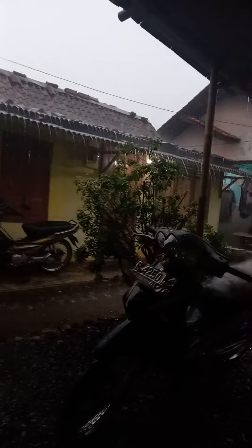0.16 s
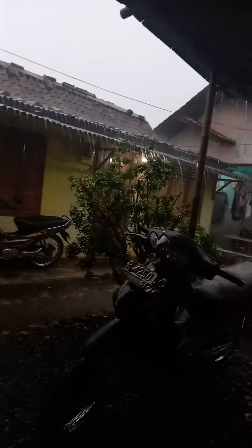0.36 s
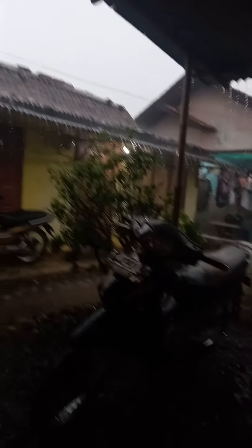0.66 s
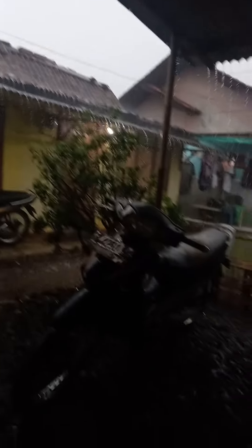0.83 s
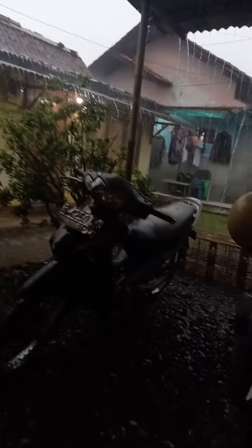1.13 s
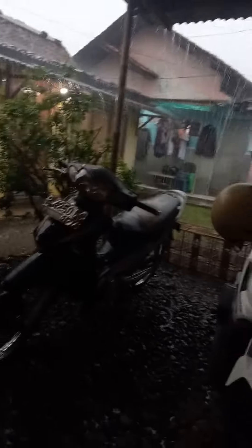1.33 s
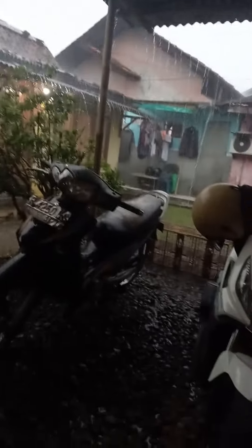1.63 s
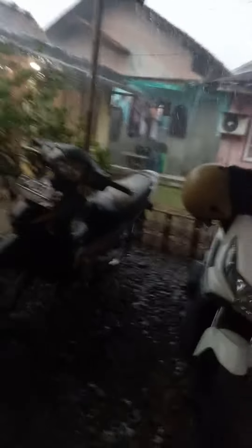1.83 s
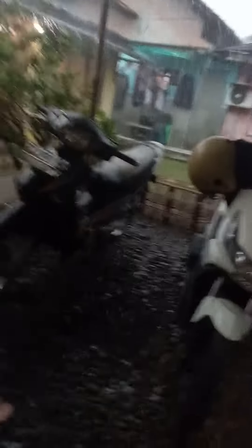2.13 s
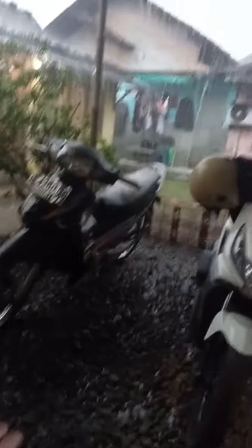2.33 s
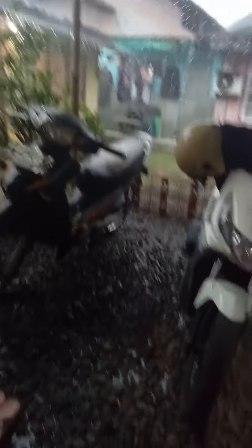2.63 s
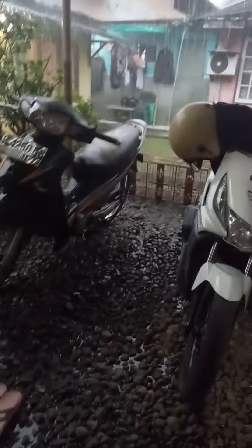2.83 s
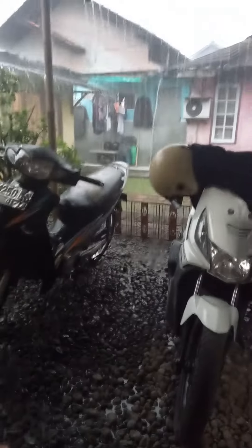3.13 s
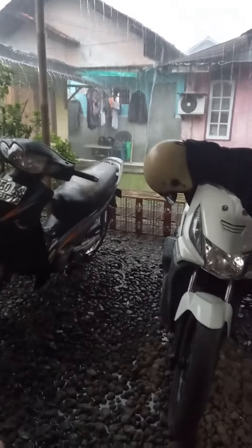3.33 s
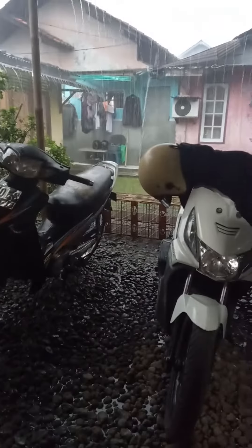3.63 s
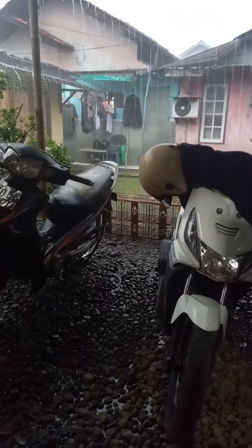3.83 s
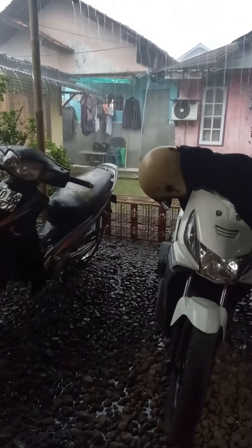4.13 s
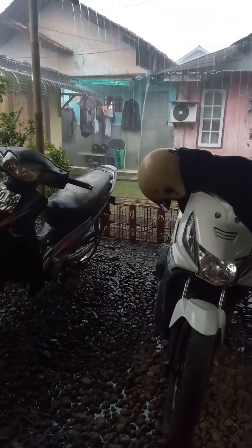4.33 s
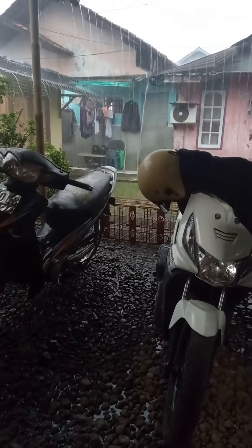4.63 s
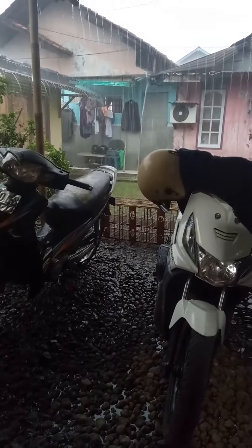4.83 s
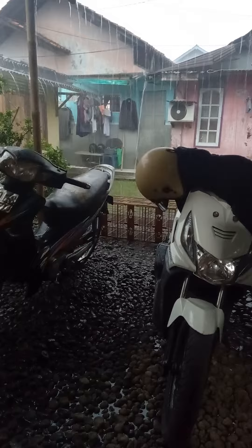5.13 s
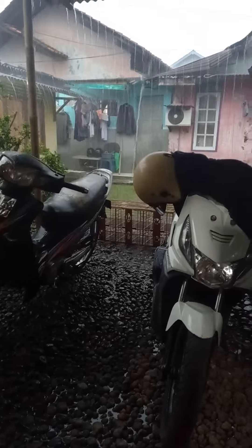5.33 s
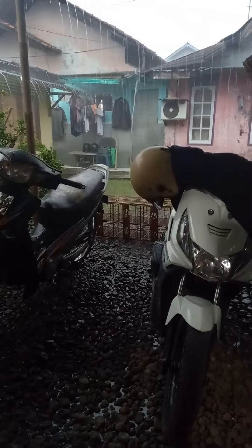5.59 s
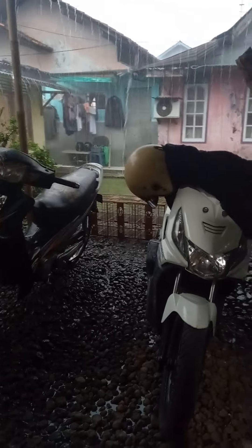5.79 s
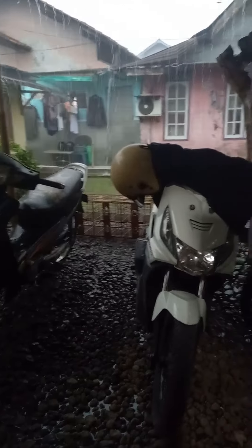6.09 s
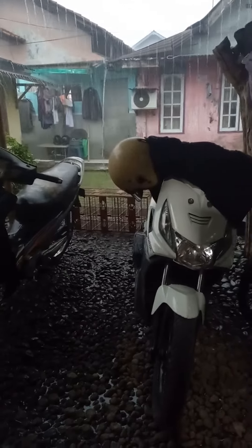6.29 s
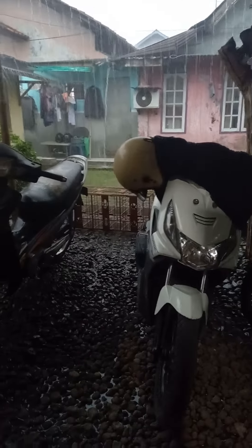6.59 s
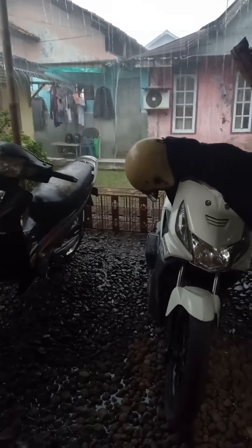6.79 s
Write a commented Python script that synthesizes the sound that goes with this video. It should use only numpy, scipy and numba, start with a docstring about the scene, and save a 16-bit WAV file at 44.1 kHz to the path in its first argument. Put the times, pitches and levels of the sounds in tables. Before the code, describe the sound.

Steady downpour with roof patter and splattering eaves run-off; a deep thunder peal bursts midway and rumbles on in fading swells.

```python
"""Heavy rain pours on a gravel yard and drums on the corrugated roof of the porch over two microphones.
Drops are short damped rings over a wash of noise; run-off from the eaves splatters, spatters and trickles.
Thunder mutters far off, breaks into a loud peal and rolls on in swells: filtered trains of random shocks,
with single booms as sinking tones. The gain control ducks everything under the peal and is slow to let go."""
import sys
import numpy as np
from scipy.fft import rfft, irfft, next_fast_len
from scipy.io import wavfile
from scipy.ndimage import uniform_filter1d, minimum_filter1d, map_coordinates
from numba import njit

SR = 44100
rng = np.random.default_rng(int(sys.argv[2]) if len(sys.argv) > 2 else 0)


def materialize(psi):
    """Save the field psi as 16-bit PCM at rate SR to the path in sys.argv[1].

    A 1-D psi becomes a single channel; in a 2-D psi each row is a channel.
    """
    bounded = np.clip(np.atleast_2d(psi).T, -1, 1)
    quanta = np.round(bounded * 32767).astype(np.int16)
    wavfile.write(sys.argv[1], SR, quanta)


N = 306495
SECONDS = np.arange(N) / SR


def amp(db):
    """Decibels to gain."""
    return 10 ** (np.asarray(db) / 20)


def unit(x):
    """Scale to rms 1."""
    return x / np.sqrt(np.mean(x ** 2) + 1e-20)


def along(points, hz):
    """Gain of (Hz, dB) points joined on a log frequency axis."""
    f, db = np.transpose(points)
    return amp(np.interp(np.log(hz + 1), np.log(f + 1), db))


def wobble(rate):
    """A smooth random curve with rate knots a second."""
    knots = rng.standard_normal(int(N * rate / SR) + 4)
    return map_coordinates(knots, [np.arange(N) * rate / SR])


def drift(start_db, db_per_s, since=0):
    """Gain that changes by a steady number of decibels a second."""
    return amp(start_db + db_per_s * (SECONDS - since))


def sides(right_db):
    """Gains that raise the right microphone by right_db and lower the left by as much."""
    return amp([[-right_db], [right_db]])


def filtered(x, response):
    """x times a response of frequency."""
    size = next_fast_len(N + 8192)
    spectrum = rfft(x, size) * response(np.fft.rfftfreq(size, 1 / SR))
    return irfft(spectrum, size)[..., :N]


def coloured(x, spectrum):
    """x filtered by the curve of a spectrum table, at rms 1."""
    return unit(filtered(x, lambda hz: along(spectrum, hz)))


# Where the rain falls around the microphones.
# Each row: lag of the right microphone in ms, share of the power in dB.
RAIN_BEARINGS = [(-.47, -5.5), (-.3, -6.5), (-.15, -10.5), (.05, -4.5), (.23, -1), (0.501, -1)]


def bearings(count=64):
    """Lags between the microphones (s) and the share of the rain's power that arrives with each."""
    ms, db = np.transpose(RAIN_BEARINGS)
    lag = np.linspace(ms.min(), ms.max(), count)
    share = amp(np.interp(lag, ms, db)) ** 2
    return lag / 1000, share / share.sum()


def wash(direct=0.61):
    """Countless far drops merge into noise: more alike at both microphones in the bass than in the treble."""
    lag, share = bearings()
    grid = np.fft.rfftfreq(2048, 1 / SR)
    likeness = np.exp(-2j * np.pi * grid[:, None] * lag) @ share
    likeness = likeness * np.interp(grid, [200, 500], [1, direct])  # the porch scatters shorter waves
    unlikeness = np.sqrt(np.abs(1 - np.abs(likeness) ** 2))
    left, other = rng.standard_normal((2, N))
    shared = filtered(left, lambda hz: np.interp(hz, grid, likeness))
    own = filtered(other, lambda hz: np.interp(hz, grid, unlikeness))
    return np.array([left, shared + own])


def drops(count, low_hz, high_hz, cycles, spread_db, size):
    """Near drops: each a short damped ring (size samples) of its own pitch, weight and bearing."""
    when, pitch, weight, place, life = rng.random((count, 5)).T
    hz = (low_hz + (high_hz - low_hz) * pitch)[:, None]
    decay = cycles * (.5 + life[:, None]) / hz
    weight_db = -spread_db * np.log(np.maximum(weight, .015))  # a few drops are much heavier
    strength = amp(weight_db)[:, None] / np.sqrt(decay)
    lag, share = bearings()
    right_lag = SR * np.interp(place, np.cumsum(share), lag)
    pair = []
    for start in (when * N, when * N + right_lag):
        start = np.abs(start)[:, None]
        index = np.ceil(start).astype(int) + np.arange(size)
        t = (index - start) / SR  # keeps the lag finer than one sample
        ring = strength * np.exp(-t / decay) * np.sin(2 * np.pi * hz * t)
        pair.append(np.bincount(index.ravel(), ring.ravel(), N)[:N])
    return unit(np.array(pair))


# Tone of the rain on the roof sheets overhead. Each row: frequency in Hz, relative level in dB per Hz.
ROOF_SPECTRUM = [(45, -33), (80, -5.5), (140, 1.5), (200, -1.5), (300, 0.5), (500, 0), (640, -0.3),
                 (790, -0.3), (1050, -3), (1450, -3), (2100, -5.5), (3000, -14.5), (5000, -18),
                 (16000, -35)]


def roof(start_db=-17, db_per_s=0.5):
    """Drops drum on the roof sheets, ever thicker; the nearest stand out of the roar as dull taps."""
    taps = drops(count=5000, low_hz=240.0, high_hz=2275, cycles=3.4, spread_db=2, size=400)
    roar = coloured(wash() + amp(-18.5) * taps, ROOF_SPECTRUM)
    return roar * drift(start_db, db_per_s)


# Tone of the rain on the gravel out in the yard. Each row: frequency in Hz, relative level in dB per Hz.
YARD_SPECTRUM = [(300, -6), (1500, 1), (2200, 2.5), (3000, 2), (4500, 0.5), (5400, 1.5), (5950, 3),
                 (6500, 5), (7000, 0.5), (9000, -0.5), (16000, -2.5)]


def yard(start_db=-18.0, db_per_s=0.1556):
    """Rain splashes on the wet gravel in uneven spurts and slowly thickens."""
    splashes = drops(count=14000, low_hz=1750, high_hz=15300, cycles=1.17, spread_db=1.5, size=100)
    spurts = amp(1.6 * wobble(32) + 0.5 * wobble(13))
    hiss = coloured(wash() + amp(-6.5) * splashes * spurts, YARD_SPECTRUM)
    return hiss * drift(start_db, db_per_s) * amp(0.53 * wobble(18))


# Tone of the run-off at the porch edge. Each row: frequency in Hz, relative level in dB per Hz.
EAVES_SPECTRUM = [(300, -20), (650, -0.3), (1000, 5), (1600, 0), (2400, -7), (2900, -10.5), (3700, -23),
                  (16000, -42)]
# Strength of the run-off, nearest at first. Each row: time in seconds, level in dB.
RUNOFF_LEVEL = [(0, -17.5), (1.2, -21), (3.1, -20.5), (3.6, -22), (4.6, -23.5), (5.4, -24), (6.95, -22)]


def eaves():
    """Strings of run-off fall from the eaves and splatter into puddles."""
    plops = drops(count=7000, low_hz=800, high_hz=3470, cycles=0.76, spread_db=0.5, size=200)
    splatter = coloured(wash() + amp(-5.5) * plops, EAVES_SPECTRUM)
    s, db = np.transpose(RUNOFF_LEVEL)
    return splatter * amp(np.interp(SECONDS, s, db) + .4 * wobble(19))


# Tone of the nearest run-off, on the right. Each row: frequency in Hz, relative level in dB per Hz.
SPATTER_SPECTRUM = [(1500, -23), (1950, 5), (2300, -2), (2850, 2), (3150, -7), (3600, -25)]


def spatter(start_db=-27.3, db_per_s=-10, right_db=5.0):
    """The nearest string of run-off, on the right, spatters brightly at first and soon sinks into the rain."""
    splats = drops(count=10000, low_hz=1800, high_hz=3200, cycles=2, spread_db=3.0, size=150)
    return coloured(splats, SPATTER_SPECTRUM) * drift(start_db, db_per_s) * sides(right_db)


# Tone of thin run-off on the stones to the right. Each row: frequency in Hz, relative level in dB per Hz.
TRICKLE_SPECTRUM = [(2300, -24), (2850, -2), (3600, -4.5), (4100, -4), (4900, -22)]


def trickle(level_db=-35.0, opens_s=1.2, right_db=5):
    """A thinner string patters crisply on the stones to the right, fading in as the microphones turn to it."""
    ticks = drops(count=5000, low_hz=2720, high_hz=4030, cycles=2.7, spread_db=3.0, size=150)
    facing = np.minimum(SECONDS / opens_s, 1)
    return coloured(ticks, TRICKLE_SPECTRUM) * amp(level_db) * facing * sides(right_db)


def shocks(count):
    """Pressure steps from the kinks of the bolt, arriving at random."""
    when, strength = rng.random((count, 2)).T
    return np.bincount((when * N).astype(int), 2 * strength - 1, N)


def rumble(spectrum, count):
    """A dense train of shocks, dulled by distance into an unbroken rumble of rms 1."""
    x = coloured(shocks(count), spectrum)
    loudness = np.sqrt(np.abs(uniform_filter1d(x ** 2, SR // 22)) + 1e-6)
    return unit(x / loudness)  # evens out chance swells


def surges(rows, attack, fade):
    """Power of overlapping arrivals: each rises, holds for its length and dies away (attack, fade in s)."""
    power = 0
    for start, db, length in rows:
        rise = np.clip((SECONDS - start) / attack, 0, 1)
        fall = np.exp(-np.maximum(SECONDS - start - length, 0) / fade)
        power = power + (amp(db) * rise * fall) ** 2
    return power


# Mid-range tone of the nearer branches. Each row: frequency in Hz, relative level in dB per Hz.
CRACKLE_SPECTRUM = [(30, -43), (60, -6), (100, -15), (160, 6), (225, -4), (300, -13.5), (450, -25.5),
                    (1200, -56)]
# Peals from nearer parts of the bolt. Each row: start in seconds, level in dB, length in seconds.
PEAL_ARRIVALS = [(3.19, -13.5, 0.26), (3.6, -17.5, 0.29), (4.1, -21, 0.92), (5.1, -22.5, 0.38),
                 (5.55, -23.5, 0.25), (5.79, -20, 0.32)]


def peals(attack=0.012, fade=0.17):
    """Nearer branches arrive abruptly and keep more of their mid range."""
    return np.sqrt(surges(PEAL_ARRIVALS, attack, fade)) * rumble(CRACKLE_SPECTRUM, count=2500)


# Single thunder booms and knocks. Each row: crest in seconds, peak in dB, pitch at the crest in Hz.
BOOM_ARRIVALS = [(.645, -15, 93), (.96, -14.5, 300), (1.481, -16, 154), (2.831, -13, 151), (2.911, -15, 97),
                 (3.17, -17, 76), (3.22, -13, 155), (3.249, -7, 238), (3.285, -13, 82), (3.329, -4, 152),
                 (3.381, -5, 160), (3.408, -3, 78), (3.465, -5, 93), (3.473, -2, 166), (3.528, -3.5, 172),
                 (3.572, -7, 247), (3.627, 1, 94.5), (3.682, -6, 93), (3.741, -7, 104), (3.801, -11, 95),
                 (3.935, -7.5, 100), (4.124, -10, 165), (4.42, -4, 98), (4.475, -17, 98),
                 (4.534, -5.5, 106), (4.608, -9.5, 101), (5.095, -15, 97), (5.163, -10, 85.4),
                 (5.23, -21, 102.4), (5.285, -8.5, 100), (5.296, -14, 220), (5.715, -2, 92),
                 (5.802, -5, 90), (5.95, -8, 150), (6.041, -11, 145), (6.195, -3, 98), (6.256, -6, 97),
                 (6.347, -9, 95), (6.682, -8, 98), (6.74, -14, 94), (6.79, -10, 101)]


def booms(rise_cycles=2.405, sag=0.037, size=8000):
    """Shocks arriving together thud for a few cycles, sinking in pitch; the higher ones are shorter."""
    out = np.zeros(N + size)
    for crest, db, hz in BOOM_ARRIVALS:
        cycle = hz * np.arange(size) / SR
        age = cycle / rise_cycles  # 1 at the crest
        envelope = (age * np.exp(1 - age)) ** 3
        phase = cycle * (1 + sag * (1 - age / 2)) + rng.random()
        start = int((crest - rise_cycles / hz) * SR)
        out[start:start + size] += amp(db) * envelope * np.sin(2 * np.pi * phase)
    return out[:N]


# Rough mid range of the nearest peals. Each row: frequency in Hz, relative level in dB per Hz.
RASP_SPECTRUM = [(150, -16), (245, 3.5), (350, 0), (600, -8.5), (1200, -28), (3000, -60)]
# Bursts of that roughness. Each row: start in seconds, level in dB, length in seconds.
RASP_BURSTS = [(3.22, -20, 0.31), (3.5, -20.5, 0.56), (4.3, -26.5, 0.54), (5.17, -25.5, 0.2),
               (5.8, -29.5, 0.21)]


def rasp(attack=0.057, fade=0.097):
    """The small, sharp shocks of the nearest peals, which only a short path preserves."""
    return np.sqrt(surges(RASP_BURSTS, attack, fade)) * rumble(RASP_SPECTRUM, count=3000)


# Swells of the roll, one for each far stretch of the bolt.
# Each row: start in seconds, level in dB, length in seconds.
ROLL_SWELLS = [(.62, -29, 0.38), (1.27, -29, 0.4), (1.97, -26, 0.22), (2.28, -31, 0.16), (2.86, -24, 0.1),
               (3.26, -14, 0.54), (3.57, -19, 0.29), (4.0, -24, 0.3), (4.36, -24, 0.32), (4.7, -20, 0.36),
               (5.03, -20, 0.34), (5.62, -17.5, 0.36), (6.05, -18.5, 0.304), (6.65, -21, 0.16)]


def roll_strength(strike_s=3.22, attack=0.018, fade=0.038):
    """Far parts of the bolt: a growing mutter, then the sinking tail of the main peal, with swells on both."""
    struck = np.clip((SECONDS - strike_s) / attack, 0, 1)
    mutter = drift(-34.5, 3)
    tail = drift(-16.5, -1.9, since=strike_s)
    bed = (1 - struck) * mutter + struck * tail
    return np.sqrt(bed ** 2 + surges(ROLL_SWELLS, attack, fade))


# Deep tone of the far thunder. Each row: frequency in Hz, relative level in dB per Hz.
RUMBLE_SPECTRUM = [(20, -45), (45, -30), (58, -23), (72, -9), (92, 1), (110, 0), (130, -10), (190, -21),
                   (300, -44), (800, -63)]


def thunder():
    """Its long waves reach both microphones almost alike; a little scatters off the house walls."""
    strength = roll_strength()
    direct = strength * rumble(RUMBLE_SPECTRUM, count=5000) + peals() + rasp() + booms()
    scattered = amp(-19) * strength * coloured(shocks(count=4000), RUMBLE_SPECTRUM)
    return direct * sides(.4) + np.array([scattered, -scattered])  # scattered sound comes from the sides


def scene():
    """Rain falls all around the porch while the thunder passes."""
    rain = roof() * sides(.8) + yard() * sides(-.3)
    run_off = eaves() + spatter() + trickle()
    return rain + run_off + thunder()


# Brief dips in level. Each row: centre in seconds, depth in dB, half width in seconds (to 1/e of the depth).
LEVEL_DIPS = [(3.5, 1.6, 0.057), (5.77, 2.2, 0.036)]


def dips():
    """Gain of the brief dips in level."""
    depth_db = sum(db * np.exp(-((SECONDS - s) / width) ** 2) for s, db, width in LEVEL_DIPS)
    return amp(-depth_db)


@njit
def held(x, fall):
    """Follow rises at once and sink back by a factor per sample."""
    out = x.copy()
    for i in range(1, len(x)):
        out[i] = max(x[i], out[i - 1] * fall)
    return out


def gain_control(x, threshold_db=-14.0, slope=0.46, hold_s=1.25, release_s=0.69):
    """Duck loud passages by slope dB per dB over the threshold, and wait before letting go."""
    power = uniform_filter1d(np.mean(x ** 2, axis=0), SR // 6, origin=SR // 22)
    excess_db = np.maximum(10 * np.log10(np.abs(power) + 1e-12) - threshold_db, 0)
    half = int(hold_s * SR / 2)
    # the greatest excess within the hold time just past
    recent_db = -minimum_filter1d(-excess_db, 2 * half + 1, origin=half, mode="nearest")
    return x * amp(-slope * held(recent_db, np.exp(-1 / (release_s * SR))))


def limited(x):
    """A look-ahead limiter keeps the peaks under full scale."""
    needed = np.minimum(1, .96 / (np.abs(x).max(axis=0) + 1e-9))
    return x * uniform_filter1d(minimum_filter1d(needed, size=301), size=301)


# Overall tone of the sound: thin deep bass, a narrow notch near 1.8 kHz, a deep gap near 8 kHz,
# softer treble above. Each row: frequency in Hz, gain in dB.
TONE_RESPONSE = [(45, -7), (70, 0), (1720, 0), (1810, -3.5), (1890, 0.5), (6700, 0.5), (7150, -6.5),
                 (7600, -24.5), (7950, -99), (8300, -34), (9400, -17.5), (12300, -12), (13900, -13),
                 (14600, -2.5)]


def record(dry, top_hz=15780):
    """Overall tone, gain control, brief dips, a limiter and the band limit."""
    x = filtered(dry, lambda hz: along(TONE_RESPONSE, hz))
    x = limited(gain_control(x) * dips())
    return filtered(x, lambda hz: hz < top_hz)


dry = scene()
out = record(dry)
materialize(out)
```